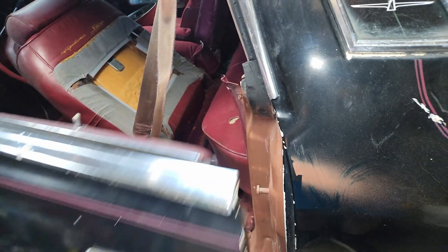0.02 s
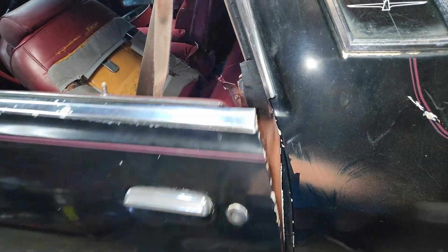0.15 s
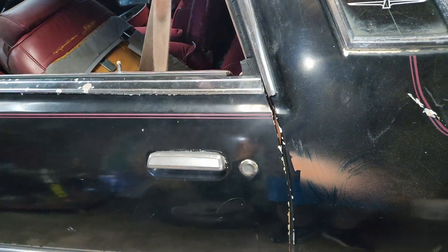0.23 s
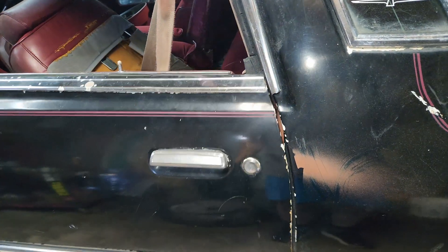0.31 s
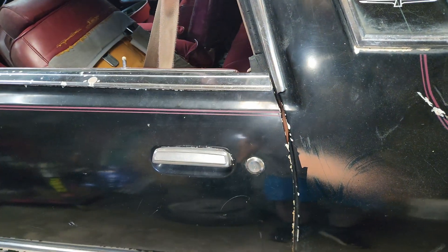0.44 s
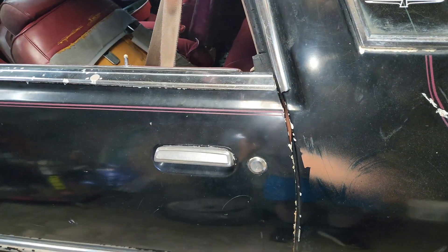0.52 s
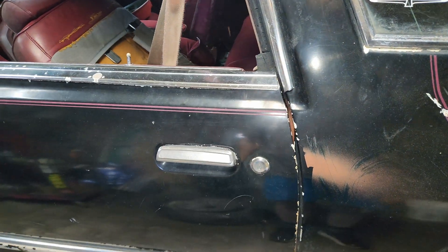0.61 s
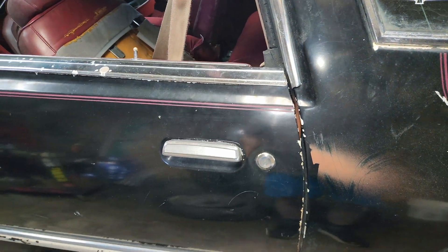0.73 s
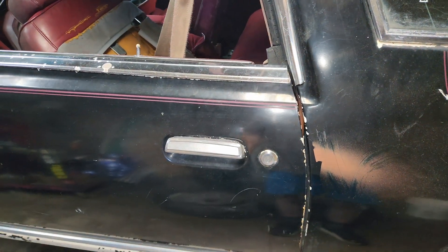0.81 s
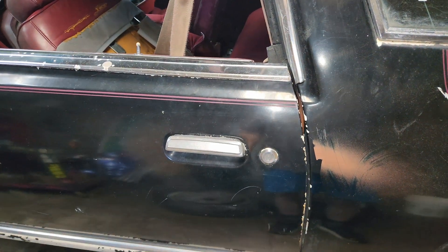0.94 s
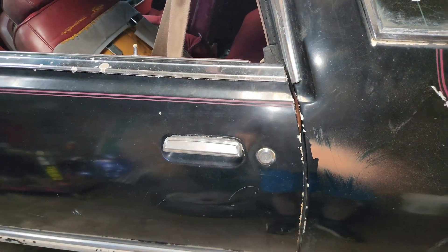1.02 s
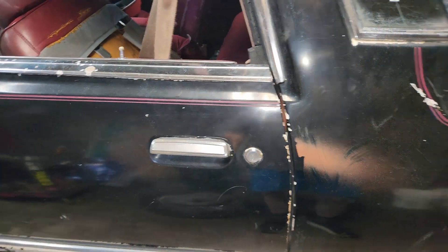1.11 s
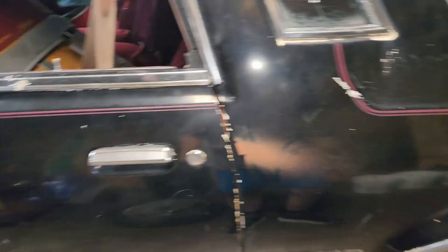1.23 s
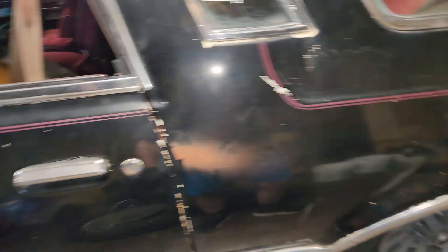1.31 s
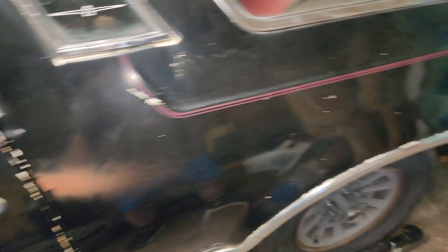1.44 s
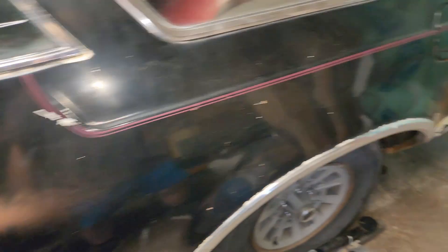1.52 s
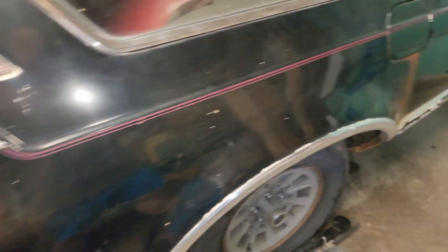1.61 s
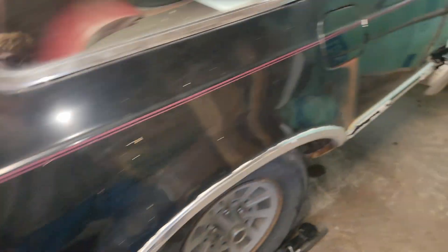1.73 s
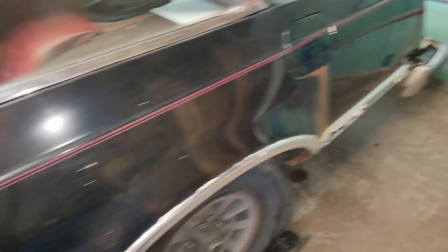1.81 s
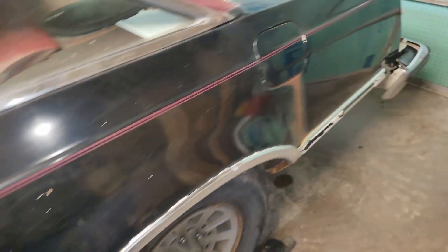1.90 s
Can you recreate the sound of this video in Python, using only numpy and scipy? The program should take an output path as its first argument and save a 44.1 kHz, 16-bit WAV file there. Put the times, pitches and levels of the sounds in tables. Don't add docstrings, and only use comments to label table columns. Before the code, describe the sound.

A heavy steel car door slams close to the microphone: brief seal brush, bright latch clatter, dull thuds and low panel boom, echoing off hard walls, then quiet shoe scuffs over a low hum.

```python
import sys
import numpy as np
from scipy import signal
from scipy.fft import rfft, irfft, next_fast_len
from scipy.io import wavfile
from scipy.ndimage import map_coordinates

SR = 44100
rng = np.random.default_rng(int(sys.argv[2]) if len(sys.argv) > 2 else 0)


def pcm_store(signal):
    levels = np.round(np.clip(np.atleast_2d(signal), -1, 1) * 32767)
    wavfile.write(sys.argv[1], SR, levels.astype(np.int16).T)


def linear_from_db(decibels):
    return 10 ** (np.asarray(decibels, float) / 20)


N = 88200


def unit(x):
    return x / np.sqrt(np.mean(x ** 2) + 1e-20)


def along(points, hz):
    f, v = np.transpose(points)
    return np.interp(np.log(hz + 1), np.log(f + 1), v)


def wobble(rate):
    knots = rng.standard_normal(int(N * rate / SR) + 4)
    return map_coordinates(knots, [np.arange(N) * rate / SR])


def filtered(x, response):
    size = next_fast_len(N + SR // 2)
    spectrum = rfft(x, size) * response(np.fft.rfftfreq(size, 1 / SR))
    return irfft(spectrum, size)[..., :N]


def peaks(table):
    def response(f):
        return sum(linear_from_db(db) * 1j * f * width / (center * center - f * f + 1j * f * width)
                   for center, width, db in table)
    return response


def spread(pair, alike):
    def mid_and_side(hz):
        angle = np.arccos(np.clip(along(alike, hz), -1, 1)) / 2
        return np.array([np.cos(angle), np.sin(angle)])
    mid, side = filtered(pair, mid_and_side)
    return np.array([mid + side, mid - side])


def grit(response, per_s, spread_db):
    happens = rng.random((2, N)) < per_s / SR
    sizes = linear_from_db(spread_db * rng.exponential(1, (2, N))) * happens
    return unit(filtered((1 + sizes) * rng.standard_normal((2, N)), response))


def strikes(rows):
    t, attack_s = np.arange(N) / SR, .0012
    power = 0
    for start, db, hold, t60 in rows:
        onset = np.clip((t - start) / attack_s, 0, 1)
        fade = linear_from_db(db - 60 * np.clip(t - start - hold, 0, 1) / t60)
        power = power + (onset * fade) ** 2
    return np.sqrt(power)


# pitch in Hz, level in dB per Hz.
HUM_TONE = [(12, -31.5), (20, -2.5), (70, -1.5), (114, -8.5), (139, -19), (274, -15.5), (600, -25.5),
            (780, -60.5), (1320, -120)]
# pitch in Hz, level in dB per Hz.
HISS_TONE = [(400, -19), (720, -2.5), (1200, -9.5), (2900, -12.5), (3800, -25), (7800, -28.5),
             (8800, -43.5), (16000, -48.5)]
# pitch in Hz, likeness (1 is the same).
HUM_ALIKE = [(30, 0.97), (150, 0.99), (500, 0.58), (2000, 0.25), (5000, 0), (15000, 0.031)]


def hum():
    def noise(tone):
        return unit(filtered(rng.standard_normal((2, N)), lambda hz: linear_from_db(along(tone, hz))))
    rumble = linear_from_db(-44 + 1.0 * wobble(6)) * noise(HUM_TONE)
    hiss = linear_from_db(-57 + 1.3 * wobble(1.6)) * noise(HISS_TONE)
    return spread(rumble + hiss, HUM_ALIKE)


# pitch in Hz, width in Hz, level in dB.
SEAL_RINGS = [(5470, 280, 1), (7400, 580, -1.5), (15000, 1500, -10), (1940, 2000, -6.5), (557, 566, -4)]
# pitch in Hz, likeness (1 is the same).
DOOR_ALIKE = [(300, 1), (700, 0.56), (1500, 0.33), (3000, 0.23), (6000, -0.0034), (12000, 0.0068)]


def seal():
    start_s, level_db, rise_db_per_s = .178, -28.5, 1049.5
    t, end = np.arange(N) / SR, LATCH_CONTACTS[0][0]
    brushing = (t > start_s) * (t < end)
    loudness = brushing * linear_from_db(level_db + rise_db_per_s * np.minimum(t - end, 0))
    noise = unit(filtered(rng.standard_normal((2, N)), lambda hz: peaks(SEAL_RINGS)(hz) ** 2))
    return spread(loudness * noise, DOOR_ALIKE)


# start in seconds, bright metal level in dB,
# dull door card (inner trim board) level in dB, hold in seconds, time to fade by 60 dB in seconds.
LATCH_CONTACTS = [
    (0.21, -11, -24.5, .009, .05),
    (0.226, -13, -27, 0.016, .05),
    (0.269, -25.5, -25, .01, .08),
    (0.279, -23, -29.5, .004, 0.065),
    (.286, -34.5, -16.5, .012, .12),
    (.308, -29, -22.5, 0.0043, .1),
    (0.361, -29.5, -23, .004, .1),
    (0.397, -64, -31, .01, .15),
]
# start in seconds, level in dB, hold in seconds,
# time to fade by 60 dB in seconds.
TRIM_TICKS = [
    (.643, -63, 0.0111, 0.033),
    (.727, -70, 0.01253, 0.038),
]
# pitch in Hz, level in dB per Hz.
STEEL_TONE = [(300, -22), (650, -5), (1700, -4), (2700, -4.5), (3400, -12), (5500, -5.5), (7600, -8.5),
              (9200, -12)]
# pitch in Hz, level in dB per Hz.
CARD_TONE = [(120, -24.5), (250, -6), (520, 1.5), (800, -5), (1400, -6), (2500, -13.5), (4000, -35.5)]
# pitch in Hz, width in Hz, level in dB.
SKIN_RINGS = [(400, 50, -4), (775, 40, 4.5), (1190, 70, -4), (1712, 60, 0), (2250, 90, -3.5),
              (4510, 150, -2.5), (5720, 120, -1), (7450, 400, 1)]


def clatter():
    metal_per_s, metal_spread_db = 4000, 0.5
    rows = np.array(LATCH_CONTACTS)
    steel = grit(lambda hz: linear_from_db(along(STEEL_TONE, hz)) * (1 + peaks(SKIN_RINGS)(hz)),
                 metal_per_s, metal_spread_db)
    board = grit(lambda hz: linear_from_db(along(CARD_TONE, hz)) * (1 + peaks(SKIN_RINGS[:3])(hz)), 440, 4)
    trim = grit(lambda hz: peaks(SEAL_RINGS[:2])(hz) ** 2, metal_per_s, metal_spread_db)
    metal = strikes(rows[:, [0, 1, 3, 4]]) * steel
    card = strikes(rows[:, [0, 2, 3, 4]]) * board
    return spread(metal + card + strikes(TRIM_TICKS) * trim, DOOR_ALIKE)


# start in seconds, size (minus swings the other way),
# pitch in Hz, time to fade by 60 dB in seconds.
DOOR_KNOCKS = [(0.2118, 0.42, 456, 0.029), (.2198, 0.68, 402, 0.042), (.232, .15, 1177, 0.035),
               (.213, 0.18, 772, 0.11), (.448, 0.22, 210.3, 0.093), (0.2403, -0.35, 73, 0.11),
               (0.2426, -.4, 200, .035), (0.2798, -0.43, 250, 0.038), (.287, .5, 307.6, 0.039),
               (0.2853, .32, 1123, 0.062), (0.3082, 0.57, 118.8, .06), (0.3239, -0.69, 352.8, 0.022),
               (.331, -0.42, 158, .03), (.352, 0.75, 140.5, 0.04), (0.386, .75, 93.3, 0.057),
               (.436, .3, 90.1, 0.13), (0.4989, 0.16, 96.8, 0.099), (0.606, -0.077, 70, 0.14),
               (0.723, 0.052, 140.2, 0.065)]


def knocks():
    t, attack_s = np.arange(N) / SR, 0.0011
    out = 0
    for start, size, hz, t60 in DOOR_KNOCKS:
        since = np.clip(t - start, 0, 1)
        swing = np.sin(2 * np.pi * hz * since) * linear_from_db(-60 * since / t60)
        out = out + size * swing * (1 - np.exp(-since / attack_s))
    return out


# pitch in Hz, level in dB, time to fade by 60 dB in seconds.
PANEL_BOOMS = [(33, -21.5, 0.59), (52, -16.5, 1), (80.23, -18.5, 0.87), (114.55, -16.5, 1.2),
               (142.4, -22, 0.77), (168.3, -22.5, 1.2), (229.2, -20, 1.15), (288.5, -25, 1.0),
               (398, -25.5, .7), (480, -24, 0.45), (572, -25.5, .6), (778, -25.5, .45)]


def panels():
    start_s, attack_s, unrest = .235, .05, .8
    skew_per_hz = .0025
    since = np.clip(np.arange(N) / SR - start_s, 0, 2)
    sides = np.array([[1], [-1]])
    out = 0
    for hz, db, t60 in PANEL_BOOMS:
        wander = 1 + unrest * (wobble(14) + 1j * wobble(12))
        swing = wander * np.exp(2j * np.pi * (hz * since + rng.random()))
        skew = skew_per_hz * hz * rng.normal() / 2
        out = out + linear_from_db(db - 60 * since / t60) * (swing * np.exp(1j * skew * sides)).imag
    return out * (1 - np.exp(-since / attack_s))


# pitch in Hz, time to fade by 60 dB in seconds.
WALL_FADE = [(60, 0.81), (250, 1.0), (700, 0.57), (2000, 0.64), (5000, 0.57), (12000, 0.34)]
# pitch in Hz, level in dB.
WALL_TONE = [(60, 2), (500, 3), (2000, 0.5), (3500, 2.5), (6000, -0.5), (15000, 2)]


def walls(x):
    delay_s = .012
    hz, t, noise = signal.stft(rng.standard_normal((2, SR)), SR, nperseg=256)
    fade_db = along(WALL_TONE, hz)[:, None] - 60 * t / along(WALL_FADE, hz)[:, None]
    tails = signal.istft(noise * linear_from_db(fade_db), SR, nperseg=256)[1]
    late = np.pad(x, (round(delay_s * SR), 0))[None]
    echoes = signal.fftconvolve(late, tails / np.linalg.norm(tails[0]), axes=1)[:, :N]
    return spread(echoes, DOOR_ALIKE)


# loudest moment in seconds, level in dB,
# rise in seconds, # fall in seconds, squeak over grit in dB.
SHOE_SCUFFS = [
    (1.15, -56.5, 0.032, 0.018, 8),
    (1.3, -74.5, 0.089, 0.062, -18),
    (1.54, -61, .012, .02, 1),
    (1.577, -55.5, .016, 0.031, -11),
    (1.835, -68, .012, .015, -4),
]
# pitch in Hz, level in dB per Hz.
SOLE_TONE = [(2000, -2), (3600, -3.5), (5500, -4), (7700, -4), (9000, -6.5), (11000, -13.5), (16000, -18)]
# pitch in Hz, width in Hz, level in dB.
SQUEAK_RINGS = [(1580, 350, 1), (990, 910, -0.5), (2600, 1700, -8.5)]


def scuffs():
    t, out = np.arange(N) / SR, 0
    rub = grit(lambda hz: linear_from_db(along(SOLE_TONE, hz)), 1500, 3.7)
    squeak = grit(lambda hz: peaks(SQUEAK_RINGS)(hz) ** 2, 600, 3.6)
    for peak, db, rise, fall, squeak_db in SHOE_SCUFFS:
        swell = np.exp(-.5 * ((t - peak) / np.where(t < peak, rise, fall)) ** 2)
        out = out + linear_from_db(db) * (swell ** 1.4 * rub + linear_from_db(squeak_db) * swell * squeak)
    return spread(out, DOOR_ALIKE)


# pitch in Hz, left over right in dB.
DOOR_LEAN = [(60, 2), (150, 0.5), (380, 2), (950, -1.5), (2380, -2), (5980, -2), (15000, 3)]


def scene():
    thuds_to_walls_db, shoes_to_walls_db, walls_db = -3.5, -4.5, -5
    metal, thuds, shoes = clatter() + seal(), knocks(), scuffs()
    sent = metal[0] + linear_from_db(thuds_to_walls_db) * thuds + linear_from_db(shoes_to_walls_db) * shoes[0]
    door = metal + thuds + panels() + linear_from_db(walls_db) * walls(sent)
    halves = np.array([[.5], [-.5]])
    return filtered(door, lambda hz: linear_from_db(along(DOOR_LEAN, hz) * halves)) + shoes + hum()


def top_cut(x):
    return signal.sosfilt(signal.butter(12, 16480, fs=SR, output="sos"), x)


def record(dry):
    duck_s, duck_db, duck_time_s, recover_db_per_s = .25, -7, .1, 0.98
    top_hz, top_edge_hz = 15900, 250
    ceiling, hardness = 1.8, 9.6
    since = np.clip(np.arange(N) / SR - duck_s, 0, 2)
    gain_db = duck_db * (1 - np.exp(-since / duck_time_s)) + recover_db_per_s * since
    x = filtered(dry, lambda hz: .5 - .5 * np.tanh((hz - top_hz) / top_edge_hz)) * linear_from_db(gain_db)
    rounded = x / (1 + np.abs(x / ceiling) ** hardness) ** (1 / hardness)
    return top_cut(rounded)


dry = scene()
out = record(dry)
pcm_store(out)
```